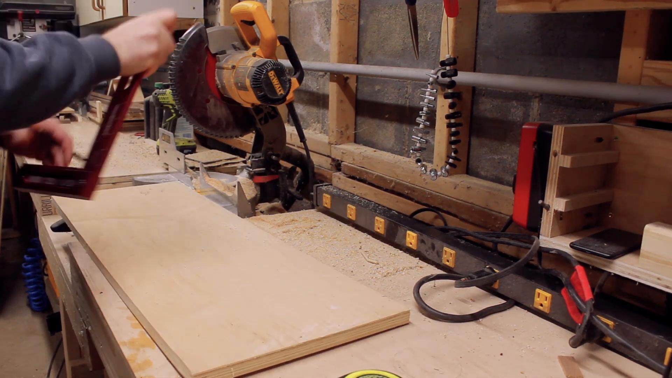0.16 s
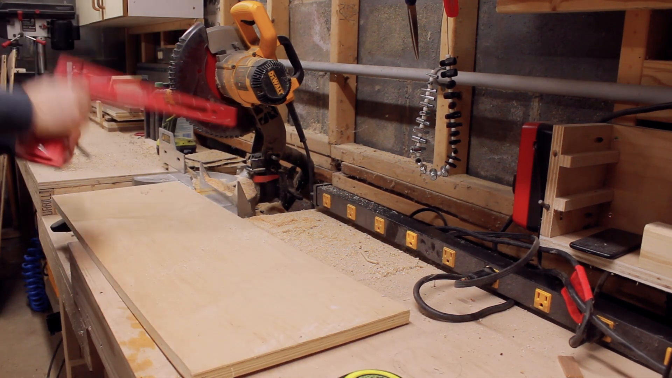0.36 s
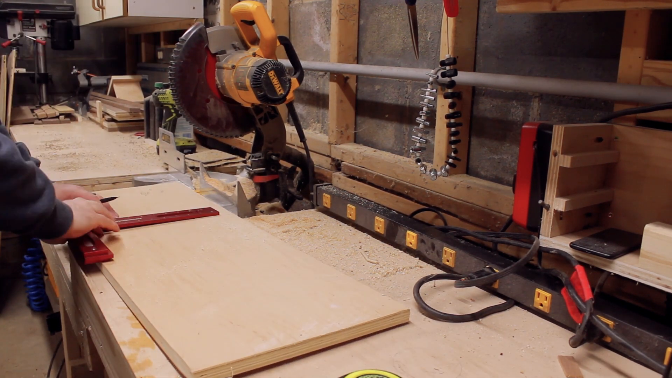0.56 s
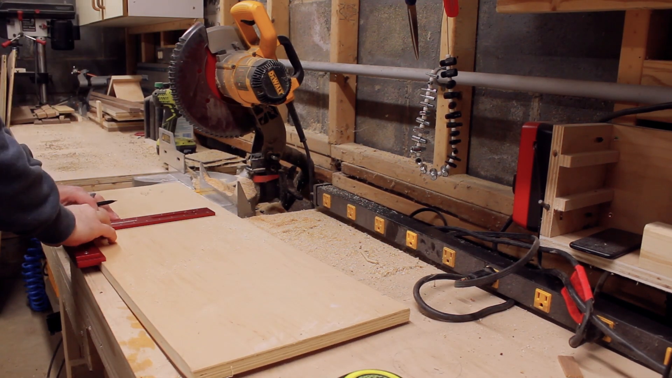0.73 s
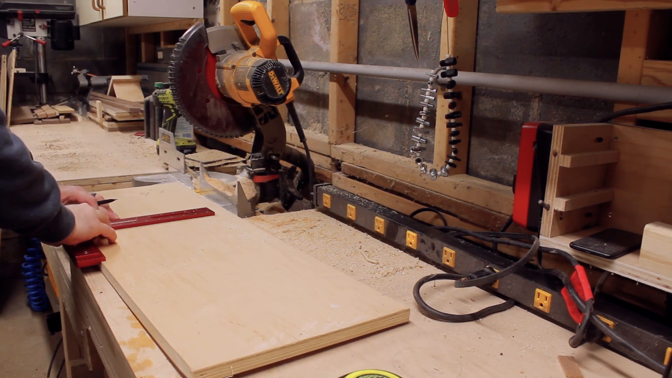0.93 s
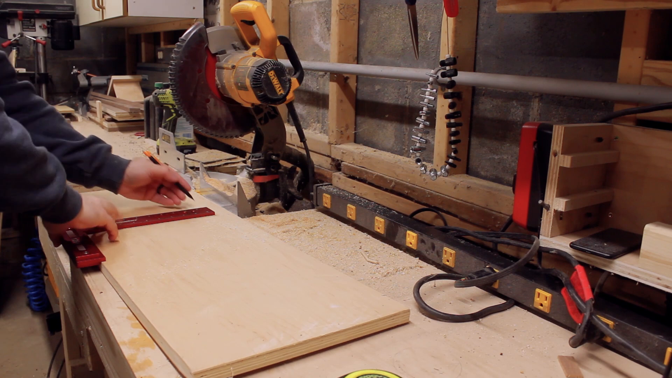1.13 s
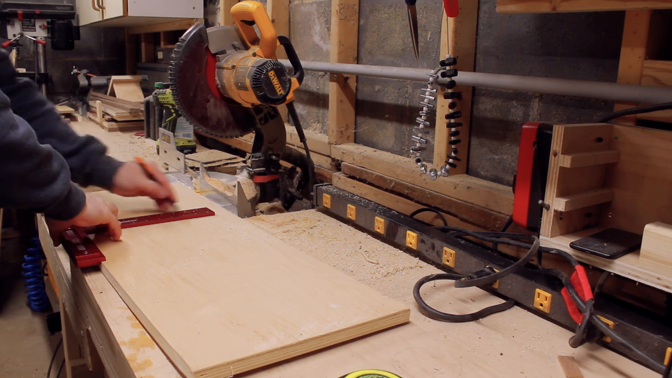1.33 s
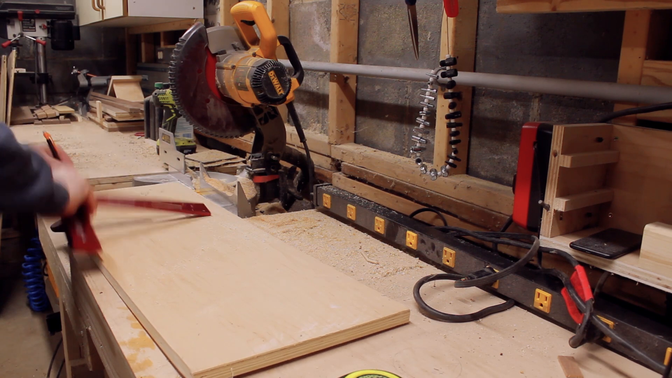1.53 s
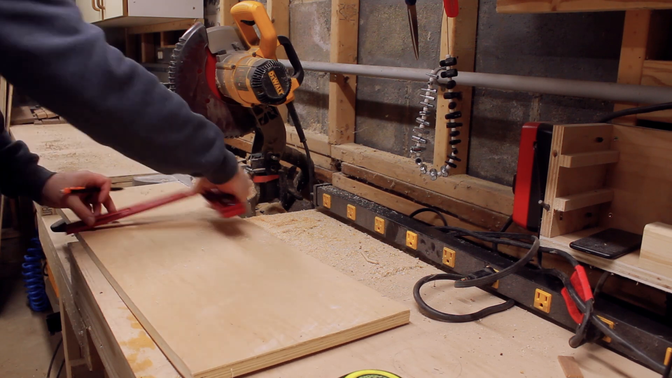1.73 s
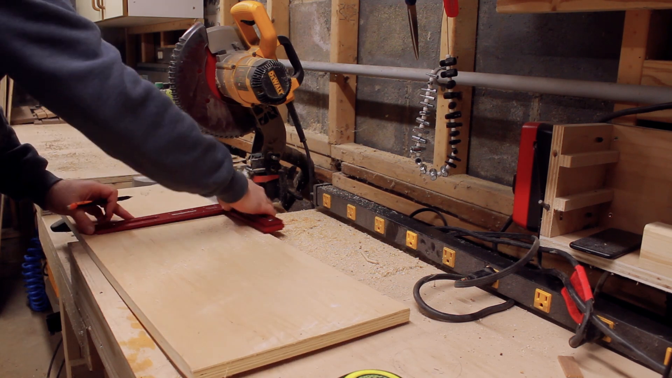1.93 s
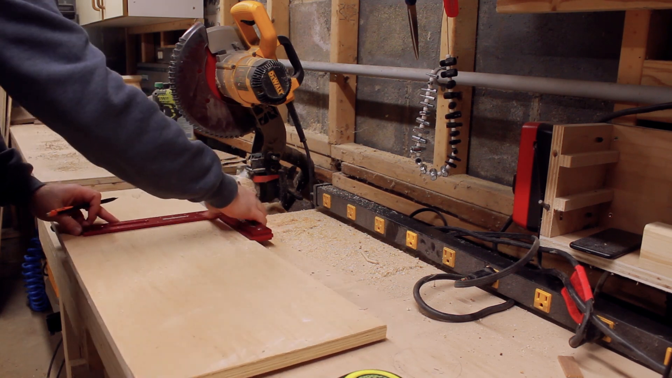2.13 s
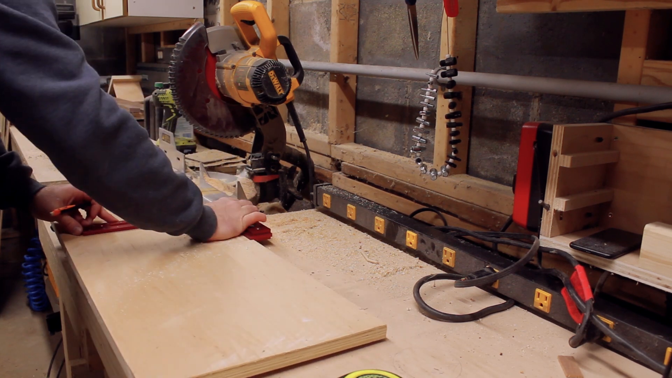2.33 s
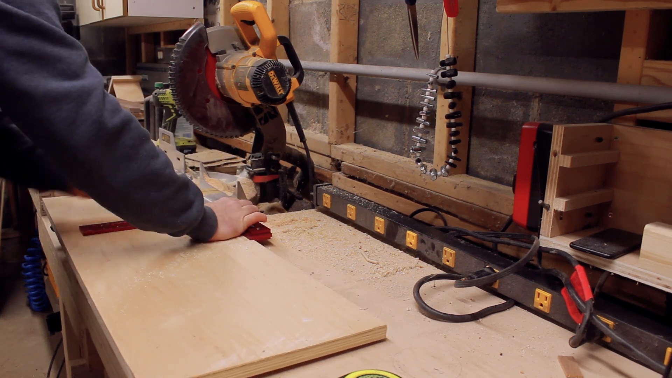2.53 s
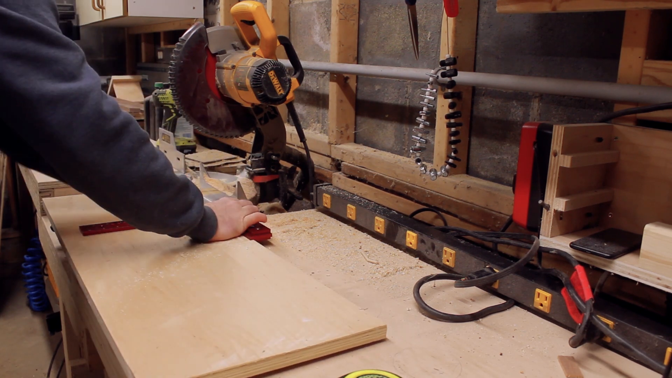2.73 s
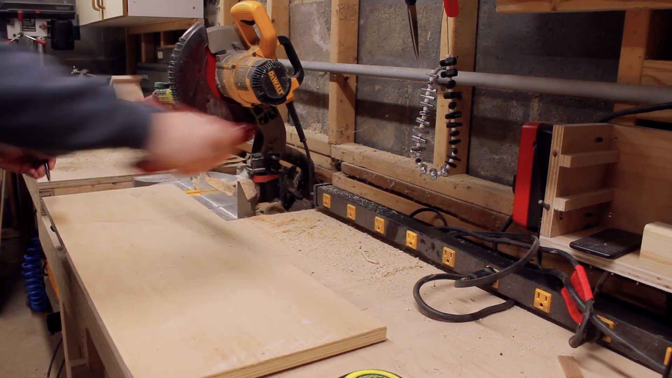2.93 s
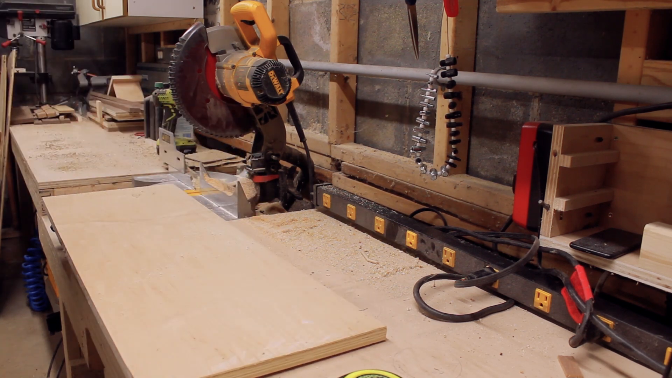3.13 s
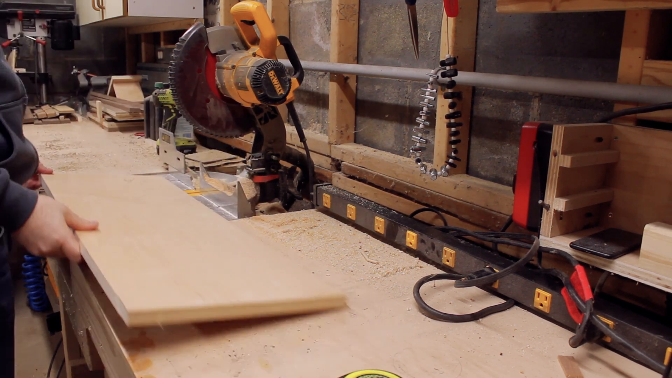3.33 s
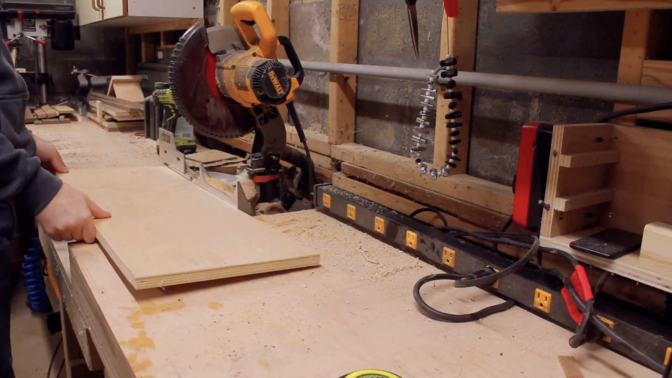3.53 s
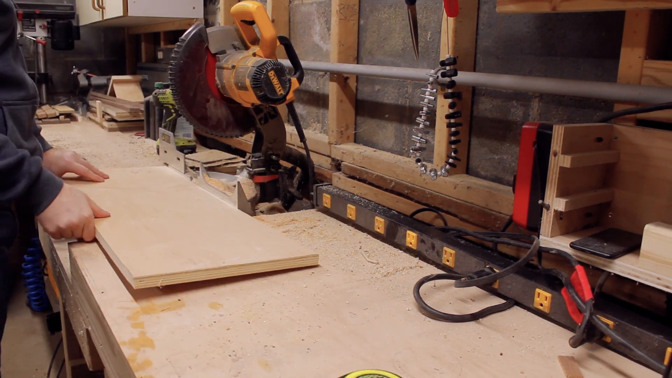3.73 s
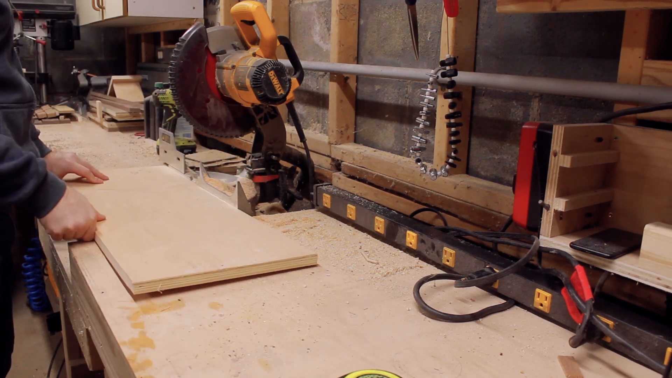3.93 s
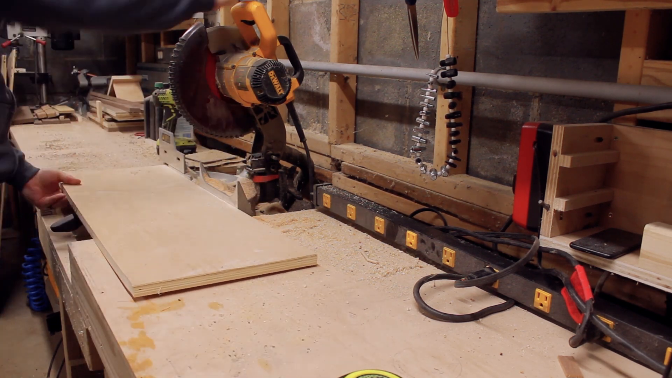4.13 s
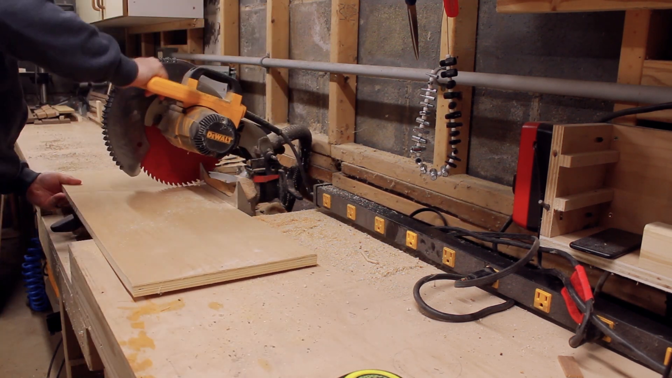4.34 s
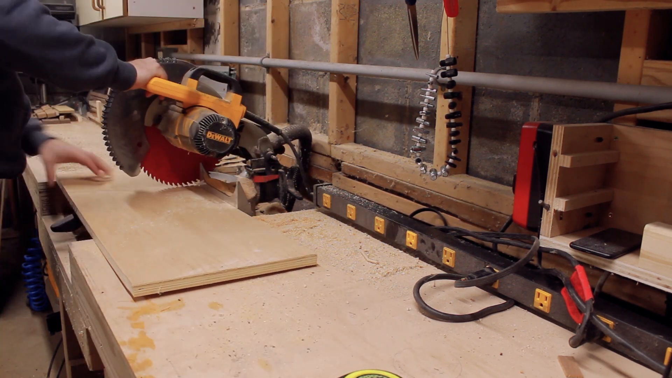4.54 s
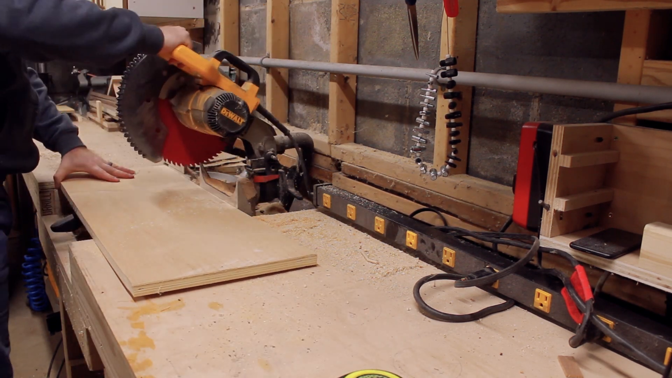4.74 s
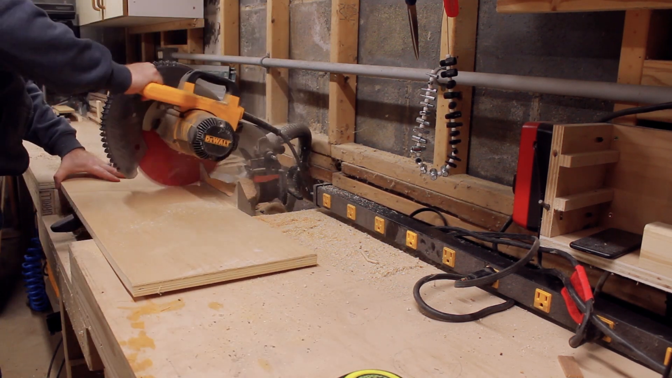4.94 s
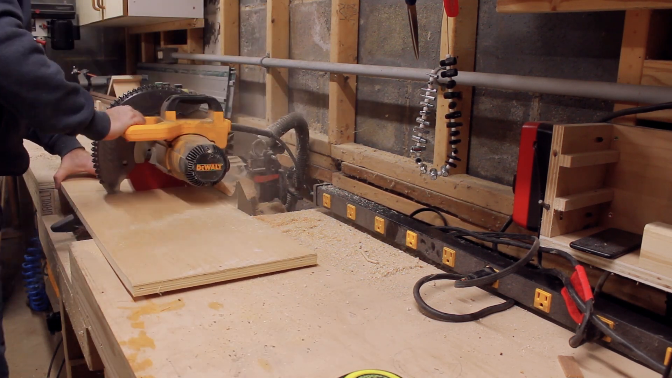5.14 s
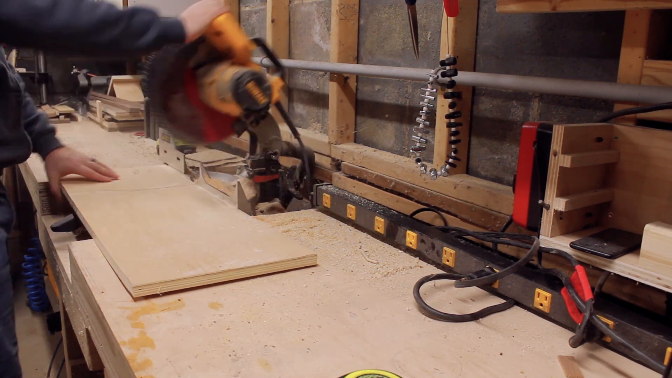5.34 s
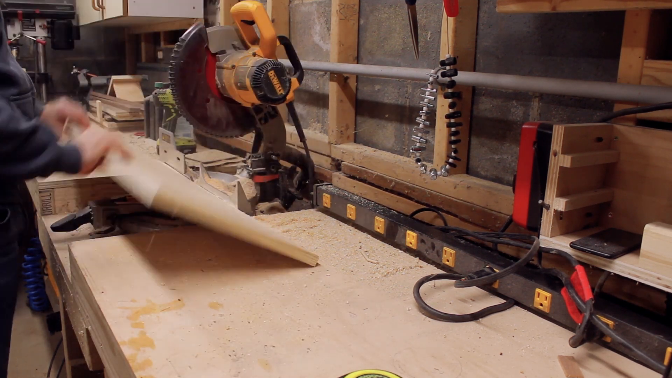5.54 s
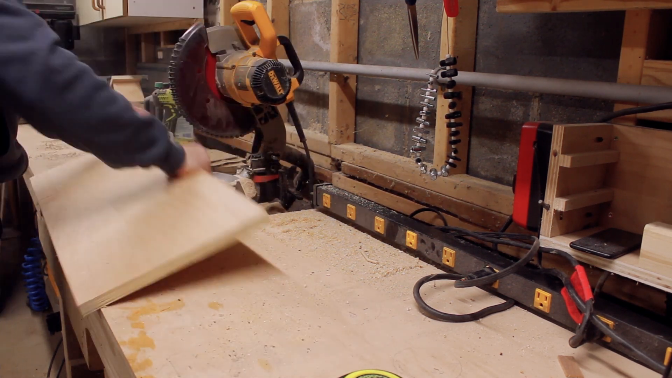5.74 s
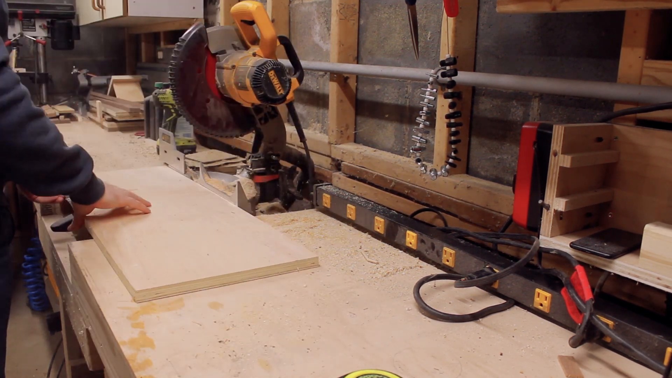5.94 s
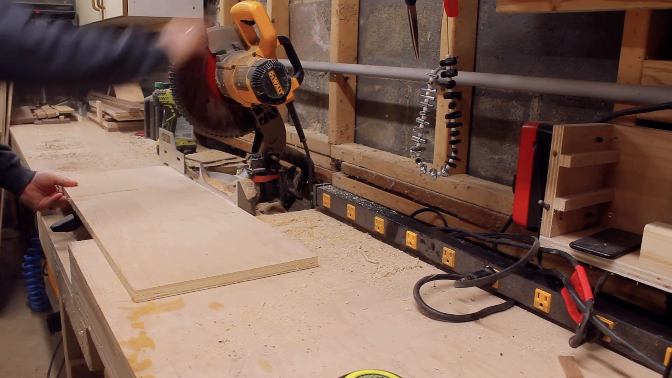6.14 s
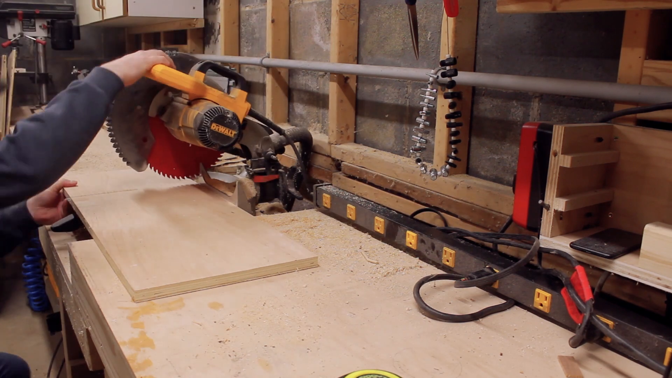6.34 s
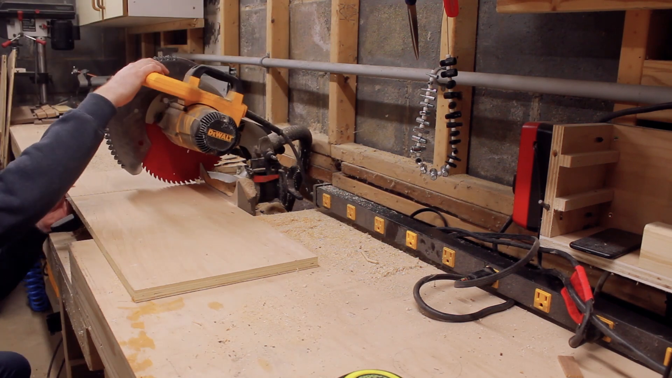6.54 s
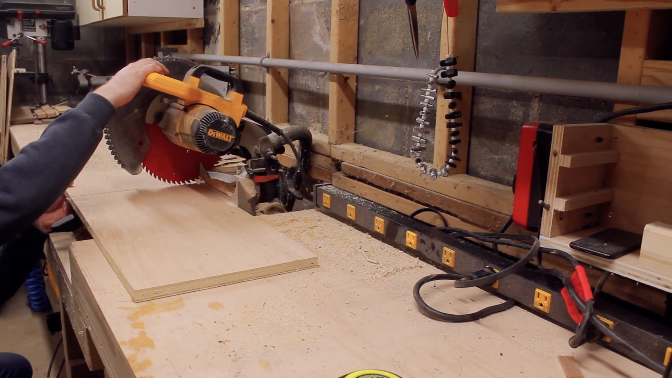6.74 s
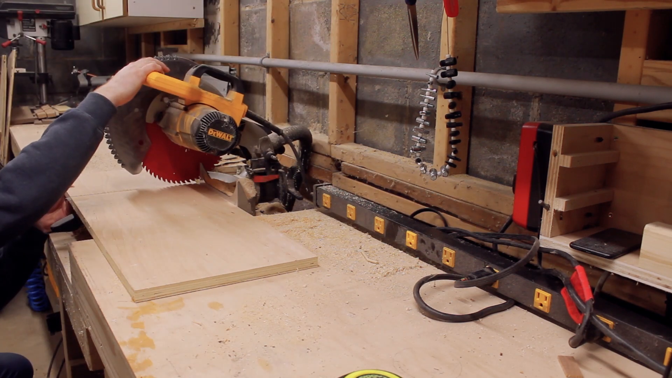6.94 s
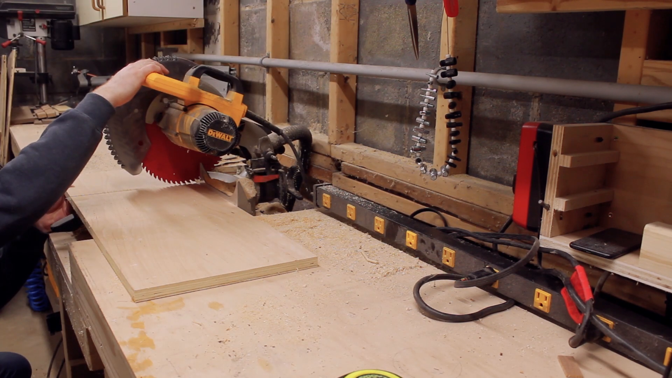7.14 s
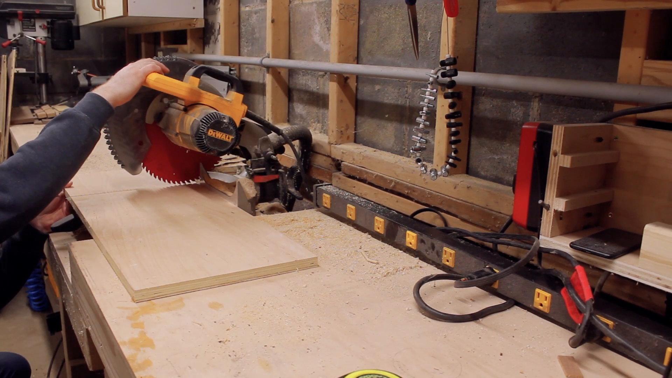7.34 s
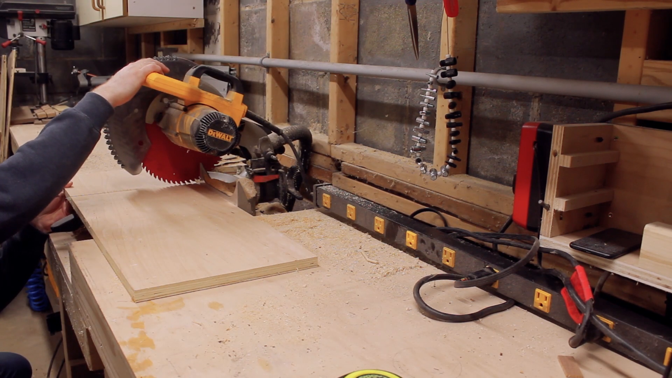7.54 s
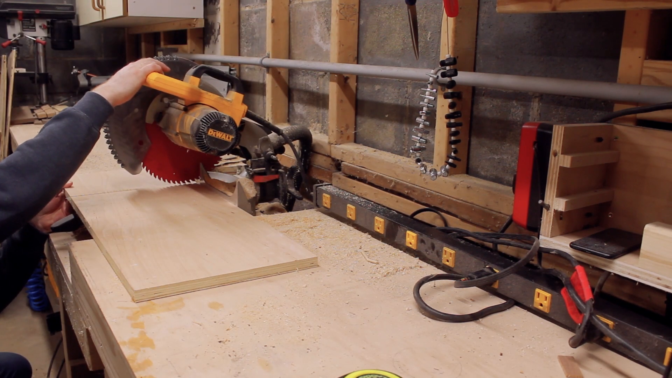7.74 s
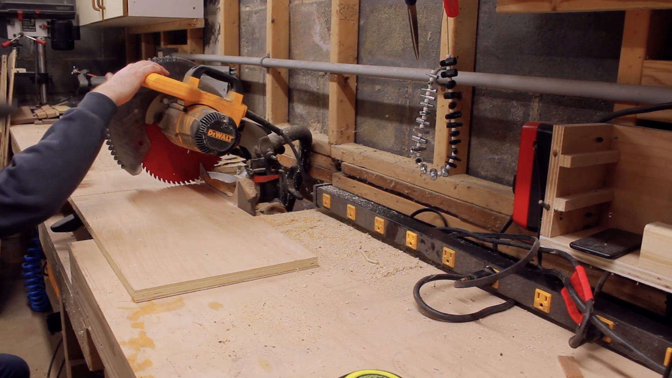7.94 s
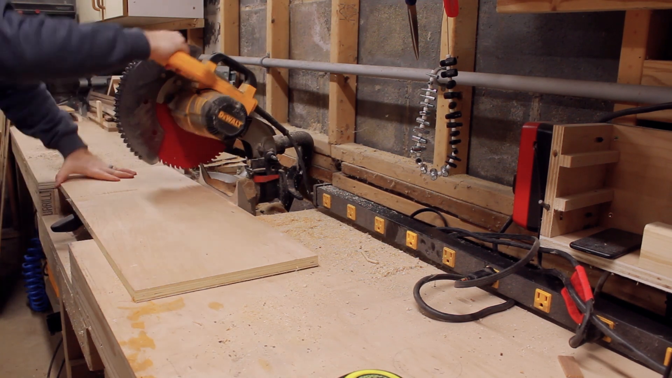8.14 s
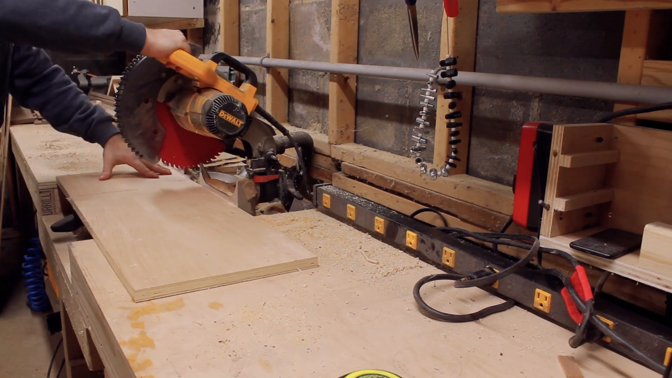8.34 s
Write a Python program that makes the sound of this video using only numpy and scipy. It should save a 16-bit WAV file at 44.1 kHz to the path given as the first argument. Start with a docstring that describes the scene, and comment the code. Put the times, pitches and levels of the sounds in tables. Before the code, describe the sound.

In a small, dry wood shop, sounds run several times faster than life. A square clacks crisply on plywood, a pencil ticks faintly, and the sheet scrapes and bumps into place. A miter saw jolts on, whines harshly through a very short cut and brakes. Two sharp plywood knocks follow, then near quiet with tiny taps over faint fan air and hum. Close, single-point pickup.

```python
"""A miter saw at work in a small wood shop, several times faster than life: pitches are high and rings short.
The saw jolts on, cuts with a whine that sags under load, and brakes: tones and noise follow the blade speed.
Before it a square clacks on plywood, a pencil marks it, the sheet is slid and knocked into place and the arm
swung down; after it the sheet is flipped and lined up again. Blows are noise bursts through resonances,
strokes are random snaps of fibre; duct-filtered fan noise and a steady two-tone electrical hum run throughout."""
import sys
import numpy as np
from scipy import signal
from scipy.fft import rfft, irfft, next_fast_len
from scipy.io import wavfile

SR = 44100
rng = np.random.default_rng(int(sys.argv[2]) if len(sys.argv) > 2 else 0)


def digitize_waveform(pressure):
    """Quantize a signal to 16-bit integers and store it at the path in sys.argv[1].

    Rows of a 2-D input are taken as channels; values are limited to [-1, 1].
    """
    field = np.atleast_2d(pressure).T
    bounded = np.clip(field, -1, 1)
    quanta = np.round(bounded * 32767).astype(np.int16)
    wavfile.write(sys.argv[1], SR, quanta)


N = 373949
TIME = np.arange(N) / SR
CUTOFF_HZ = 15900  # top of the audible band here
SWITCH_ON_S, BRAKE_ON_S = 4.8515, 5.278
# free speed of the blade, time constant of spin-up, share of speed lost at full load, time for braking to halve it
FREE_TURNS_PER_S, SPIN_UP_S, FULL_LOAD_SAG, BRAKE_HALVING_S = 268, 0.048, 0.245, 0.065
# motor current relative to what full load takes: switch-on surge, its decay, idling draw; then the overall level
INRUSH, INRUSH_S, IDLE_CURRENT, CURRENT_DB = 3.46, 0.029, 0.17, -38.5
WIND_FULL_TURNS_PER_S, WIND_POWER = 171, 2.54  # below this speed blade noise falls as a power of the speed
# How hard the blade is pushed through the sheet: time_s, load (0 to 1)
LOAD_CURVE = [(4.958, 0), (4.975, .44), (5.02, .6), (5.08, 1), (5.11, .97), (5.15, .77), (5.19, .36),
              (5.25, .07)]


def saw(throb, uneven_db):
    """Torque and speed balance: load slows the blade and raises the current, and both shape the sound."""
    load = np.interp(TIME, *np.transpose(LOAD_CURVE))
    since_on = np.maximum(TIME - SWITCH_ON_S, 0)
    since_brake = np.maximum(TIME - BRAKE_ON_S, 0)
    spin = FREE_TURNS_PER_S * (1 - np.exp(-since_on / SPIN_UP_S))
    spin = spin * (1 - FULL_LOAD_SAG * load) / (1 + since_brake / BRAKE_HALVING_S)
    flutter = 0.006 * drift(500)
    angle = 2 * np.pi * np.cumsum(spin * (1 + flutter)) / SR
    wind = np.minimum(spin / WIND_FULL_TURNS_PER_S, 1) ** WIND_POWER

    switch_times = [SWITCH_ON_S, SWITCH_ON_S + 0.005, BRAKE_ON_S - 0.02, BRAKE_ON_S + 0.02]
    powered = np.interp(TIME, switch_times, [0, 1, 1, 0])
    surge = INRUSH * np.exp(-since_on / INRUSH_S)
    current = powered * from_db(CURRENT_DB) * (surge + IDLE_CURRENT + load)

    # the blade bites harder once a turn, and unevenly
    bite = (1 + throb * np.sin(angle)) * from_db(uneven_db * drift(50))
    rush_level = wind * noise_level(load, surge, idle_db=-38, load_rise_db=8, surge_rise_db=14)
    spray_level = wind * noise_level(load, surge, idle_db=-37.5, load_rise_db=5.5, surge_rise_db=7)
    moving = bite * (cut_rush(rush_level) + chip_spray(spray_level))
    moving = moving + gear_whine(wind * current, spin, angle)
    moving = moving + brake_whine(rush_level, since_brake, spin, angle)
    moving = moving + tooth_whistle(wind, spin, angle)
    moving = moving + jolt(level_db=-17, rattle_s=0.018, fade_s=0.0092)
    return in_shop(moving, room_db=-3.0) + motor_buzz(current, powered)


def noise_level(load, surge, idle_db, load_rise_db, surge_rise_db):
    """Radiated noise grows with the work done: gain rises with cutting load and with the starting surge."""
    return from_db(idle_db + load_rise_db * load + surge_rise_db * np.minimum(surge, 1))


# Broad spectrum of motor and cut: pitch_hz, level_db (per Hz)
RUSH_COLOUR = [(80, -64), (220, -34), (350, -35), (600, -16.5), (1000, -8), (1800, 0), (2600, -3),
               (3300, 0), (4600, -2.5), (6000, -6.5), (9000, -34.5)]
# Resonances of housing and blade: pitch_hz, width_hz, level_db
SAW_RESONANCES = [(1100, 80, -3), (1720, 90, 4.5), (2140, 69, 5), (2395, 50, 3), (3140, 190, 5.5),
                  (3803, 110, 2.5), (4392, 70, 6.5)]


def cut_rush(level):
    """Resonant filtering of impulses: random snaps of fibre excite the housing and blade."""
    return level * rms_one(colour(grains(per_s=9800, spread_db=2.0), RUSH_COLOUR, SAW_RESONANCES))


# Broad spectrum of the flying chips: pitch_hz, level_db (per Hz)
CHIP_COLOUR = [(1000, -59), (3000, -38.5), (5000, 0), (9000, 5.5), (11000, 3.5), (13500, 2), (16000, -1.5)]


def chip_spray(level):
    """Shot noise: many tiny independent impacts merge into a bright hiss."""
    return level * rms_one(colour(grains(per_s=13000, spread_db=2.0), CHIP_COLOUR))


# Gear lines under load: multiple of the blade's turning, level_db
GEAR_LINES = [(1, -35), (23.5, -9), (30.3, 0), (35.5, -14), (42, -15)]


def gear_whine(level, spin, angle):
    """Order tones of meshing gears: pitch follows the speed and strength follows the torque."""
    return level * shaft_lines(GEAR_LINES, spin, angle)


# Whines under braking: multiple of the blade's turning, level_db (relative to the rush)
BRAKE_LINES = [(4, -10), (12, -3), (30, -5), (42, -6), (76, -5), (96, -4), (120, -3)]


def brake_whine(rush_level, since_brake, spin, angle):
    """Order tones of a decelerating shaft: they fall in pitch as the brake bites."""
    attack = np.minimum(since_brake / 0.025, 1)
    release = np.exp(-since_brake / 0.1)
    return rush_level * attack * release * shaft_lines(BRAKE_LINES, spin, angle)


def shaft_lines(orders, spin, angle):
    """Phase locking: rough tones at fixed multiples of the blade's turning, faded out above the cutoff."""
    total = 0
    for order, level_db in orders:
        audible = np.interp(order * spin, [CUTOFF_HZ, SR / 2], [1, 0])
        total = total + from_db(level_db + 2.7 * drift(40)) * np.sin(order * angle) * audible
    return np.sqrt(2) * total


TEETH, WHISTLE_DB = 60, -45  # level away from the resonances
# Blade resonances that the whistle sweeps over: pitch_hz, width_hz, level_db
WHISTLE_RESONANCES = [(10940, 1000, 17), (12200, 500, 7), (13260, 250, 15)]


def tooth_whistle(wind, spin, angle):
    """Air shed at the tooth-passing frequency: a narrow, unsteady whistle that flares at resonances."""
    in_phase = (1 + 0.5 * drift(100)) * np.sin(TEETH * angle)
    quadrature = 0.5 * drift(400) * np.cos(TEETH * angle)
    flare = resonance_gain(TEETH * spin, WHISTLE_RESONANCES)
    return from_db(WHISTLE_DB) * wind * flare * (in_phase + quadrature)


# Spectrum of gears taking up the slack: pitch_hz, level_db (per Hz)
SLACK_COLOUR = [(70, -66), (250, -39.5), (460, -19.5), (1000, -8.5), (1400, -19), (2000, -5), (4500, -2.5),
                (9000, -6), (16000, -20)]
# Resonances of the jolted gear case: pitch_hz, width_hz, level_db
GEAR_CASE_RESONANCES = [(475, 58.8, 8.5), (940, 140, 7.5), (1930, 110, 11), (2324, 128.8, 2),
                        (2800, 90, 2.5), (4170, 120, 5), (4680, 200, 2)]


def jolt(level_db, rattle_s, fade_s):
    """Impact excitation through slack: at switch-on the gears slam together and rattle for a moment."""
    age = TIME - SWITCH_ON_S
    strength = (age > 0) * np.exp(-np.maximum(age - rattle_s, 0) / fade_s)
    rattle = colour(grains(per_s=9000, spread_db=5.0) * strength, SLACK_COLOUR, GEAR_CASE_RESONANCES)
    return from_db(level_db) * rattle * np.linalg.norm(strength) / np.linalg.norm(rattle)


BUZZ_HZ = 479.7
# Magnetic buzz that grows with the current: multiple of the base pitch, level_db
BUZZ_LINES = [(1, -21), (2, -5), (4, 3.5), (5, -12), (7, -8)]
# Tones that ring the housing whatever the load: multiple of the base pitch, level_db
FIELD_LINES = [(2, -49.5), (3, -38.5)]


def motor_buzz(current, powered):
    """Magnetic forcing: harmonics of one wavering pitch, part following current and part the switch alone."""
    phase = 2 * np.pi * np.cumsum(BUZZ_HZ + 2.2 * drift(20)) / SR
    buzz = sum(from_db(db + 2 * drift(20)) * np.cos(k * phase) for k, db in BUZZ_LINES)
    field = sum(from_db(db + drift(15)) * np.sin(k * phase) for k, db in FIELD_LINES)
    return np.sqrt(2) * (current * buzz + powered * field)


# Square set down on the sheet: start_s, level_db, treble_db (high for a bare edge, low for a cushioned face)
SQUARE_CONTACTS = [(0.502, -40.5, 2.5), (0.555, -44.5, 4), (0.599, -36.5, 1.5), (0.607, -42.5, -5),
                   (0.686, -51, -17), (0.694, -35, -2), (1.761, -47.5, -19.5), (1.86, -33.5, 0.5),
                   (1.874, -45, -2), (1.951, -51, -9.5), (2.018, -58.5, -4), (2.145, -50, -4),
                   (2.151, -39.5, -4), (2.828, -62.5, -2), (2.937, -61, 5)]
# Broad colour of the square: pitch_hz, level_db (per Hz)
SQUARE_SPECTRUM = [(60, -42), (170, -26.5), (280, -28), (480, -9.5), (770, -6.5), (2100, 6), (2800, -4),
                   (6000, -5), (9000, -12), (16000, -27.5)]
# Resonances of the square: pitch_hz, width_hz, level_db (over the broad colour)
SQUARE_RESONANCES = [(494, 70, 2), (1476, 27, 5), (2200, 64, 3.5), (2370, 45, 6.5), (3294, 57, 11.5),
                     (4190, 110, 8.5), (5860, 51, -5), (8400, 190, 5.5)]


def square_blows():
    """Impact excitation of a square: edge or face on plywood sets off its resonances."""
    return blows(SQUARE_CONTACTS, SQUARE_SPECTRUM, SQUARE_RESONANCES, click_db=-2.0, crack_s=0.0035,
                 room_db=1.0, thump_db=-21, hard_rise_s=0.0032, soft_rise_s=0.0024)


# Sheet knocking on bench and fence, and at 2.068 s a soft thump of the square shifting on it: start_s,
# level_db, treble_db
SHEET_CONTACTS = [(2.068, -55.5, -15), (3.546, -48.5, -51), (3.619, -53, -33), (3.742, -55, -30),
                  (3.911, -65.5, -29), (3.984, -59, -21), (5.465, -45, -31), (5.766, -58, -20.5),
                  (5.774, -43, -9.5), (5.837, -25, 3.5), (5.868, -22, -1), (5.992, -31.5, -11.5),
                  (7.063, -44, -15.5), (7.804, -46.5, -16), (7.863, -63.5, -19), (8.233, -56.5, -4),
                  (8.273, -52, -11), (8.368, -46, -15.5)]
# Broad colour of the sheet: pitch_hz, level_db (per Hz)
SHEET_SPECTRUM = [(40, -54.5), (150, -26.5), (380, -15.5), (570, -6.5), (780, -6.5), (1200, -1.5),
                  (2200, -5), (3700, -6.5), (6500, -15), (10000, -21.5), (16000, -33)]
# Resonances of the sheet: pitch_hz, width_hz, level_db (over the broad colour)
SHEET_RESONANCES = [(619, 82, 7.8), (1020, 90, 3), (1420, 60, 1.9), (1690, 23, 4), (1760, 80, 5),
                    (2140, 70, 8.6), (2839, 110, 4.3), (5630, 160, 2.5)]


def sheet_blows():
    """Impact excitation of a plate: the plywood knocks on bench and fence, and once thumps softly as the square
    shifts on it."""
    return blows(SHEET_CONTACTS, SHEET_SPECTRUM, SHEET_RESONANCES, click_db=-6.5, crack_s=0.0028,
                 room_db=2.0, thump_db=-19.0, hard_rise_s=0.0022, soft_rise_s=0.004)


# Saw arm and blade guard clacking: start_s, level_db, treble_db
GUARD_CONTACTS = [(4.239, -56.5, 0.5), (4.261, -59.5, -6), (5.278, -39, -4), (5.453, -47, 1),
                  (6.279, -56, 1), (6.302, -57.5, 1), (6.442, -79, 11)]
# Broad colour of the guard: pitch_hz, level_db (per Hz)
GUARD_SPECTRUM = [(60, -53), (200, -31), (535, -7), (1500, -4), (3000, 2), (4200, -3), (9400, -7.5),
                  (16000, -17)]
# Resonances of the guard: pitch_hz, width_hz, level_db (over the broad colour)
GUARD_RESONANCES = [(2170, 87, 5.1), (3050, 190, 8.2), (5800, 200, 2.8), (8420, 420, 2.8)]


def guard_blows():
    """Impact excitation of arm and guard: each clack sets off their resonances."""
    return blows(GUARD_CONTACTS, GUARD_SPECTRUM, GUARD_RESONANCES, click_db=-8, crack_s=0.0052,
                 room_db=5.5, thump_db=-22.5, hard_rise_s=0.0015, soft_rise_s=0.0029)


THUMP_GROWTH = 0.73  # dB of low thump per dB of strength: gentle blows sound rounder, hard ones sharper


def blows(hits, spectrum, modes, click_db, crack_s, room_db, thump_db, hard_rise_s, soft_rise_s):
    """Source-filter impact: a click, a brief crack and the room's reflections drive the object's resonances."""
    out = np.zeros(N)
    early = SR // 50  # the 20 ms whose levels are set
    for start_s, strength_db, treble_db in hits:
        tail = shop_tail()
        t = TIME[:len(tail)]
        hardness = np.interp(treble_db, [-14, 2], [0, 1])  # cushioned to bare edge
        rise_s = soft_rise_s + hardness * (hard_rise_s - soft_rise_s)
        rise = 1 - np.exp(-(t / rise_s) ** 2)
        crack = rng.standard_normal(len(t)) * rise * np.exp(-t / crack_s)
        force = crack / np.linalg.norm(crack) + from_db(room_db) * tail * rise
        force[SR // 500] += hardness * from_db(click_db)  # click 2 ms in
        # each knock favours the resonances a little differently, at random
        struck = [(hz, width, db + 3 * rng.standard_normal()) for hz, width, db in modes]
        knock = colour(force, spectrum, struck)
        # strength and hardness tilt the whole colour
        low_db = thump_db + THUMP_GROWTH * strength_db
        wanted_db = np.array([low_db, strength_db, strength_db + treble_db])
        low, middle, high = wanted_db - band_levels(knock[:early])
        add(out, start_s, colour(knock, [(700, low), (1400, middle), (2600, middle), (5500, high)]))
    return out


def band_levels(x):
    """Three-band analysis: low, middle and high level in dB, split at 1 and 4 kHz."""
    levels = []
    for hz, kind in [(1000, "low"), ([1000, 4000], "band"), (4000, "high")]:
        band = signal.sosfilt(signal.butter(4, hz, kind, fs=SR, output="sos"), x)
        levels.append(20 * np.log10(np.std(band)))
    return np.array(levels)


# Blows that leave the square or the sheet free to ring: start_s, pitch_hz, level_db, t60_s
FREE_RING_EVENTS = [(.503, 5650, -30.5, 0.093), (2.068, 619, -51, 0.17), (2.82, 2210, -50, 0.16),
                    (3.911, 615, -51, 0.18), (5.84, 629.6, -25.5, .2), (5.995, 1845, -27.5, 0.15),
                    (8.369, 2175, -35.5, 0.12)]


def free_rings(width_hz):
    """Free vibration: let go by the hand, a struck thing rings briefly in a cluster of close modes."""
    out = np.zeros(N)
    for start_s, hz, level_db, t60_s in FREE_RING_EVENTS:
        age = np.maximum(TIME - start_s, 0)
        swell = 1 - np.exp(-age / 0.0026)
        decay = from_db(level_db - 60 * age / t60_s)
        beating = np.tanh(2 * drift(width_hz))
        out += decay * swell * beating * np.sin(2 * np.pi * hz * age)
    return out


RUMBLE_DB, RUMBLE_DB_PER_OCTAVE = -9, -2.5  # re the hiss at a 1 kHz scuff; finer points shake the board less
# Strokes of pencil, square, sheet and swinging guard: strongest_s, length_s, level_db, scuff_hz
RUB_STROKES = [(1.395, 0.032, -60, 4300), (1.465, 0.057, -60.5, 6100), (1.628, 0.015, -57, 6100),
               (1.81, 0.08, -63.5, 1600), (2.08, 0.045, -56.5, 1950), (2.815, 0.046, -59, 2260),
               (2.922, 0.036, -62, 1620), (3.402, 0.043, -54, 2270), (3.46, 0.05, -55.5, 1260),
               (3.54, 0.036, -58.5, 1100), (3.68, 0.03, -65, 2000), (4.275, 0.06, -61, 2880),
               (6.315, 0.039, -56.5, 2970)]
# Hiss of the rubbing: pitch_hz, level_db (per Hz)
HISS_COLOUR = [(100, -46), (600, -16), (1500, 5), (5000, 1.5), (8000, -0.5), (16000, -14.5)]
# Rumble of the board underneath: pitch_hz, level_db (per Hz)
RUMBLE_COLOUR = [(50, -37), (130, -16), (175, 6), (230, -10), (620, 14), (1000, 10), (2000, -24)]


def rubbing(scuff_db, scuff_width):
    """Friction on a rough surface: catches on the grain give a gritty hiss, a scuff pitch and board rumble."""
    out = np.zeros(N)
    span = SR // 2
    middle_s = span / SR / 2
    catches = grains(per_s=3000, spread_db=1.0) * from_db(2.2 * drift(65))
    for k, (strongest_s, length_s, level_db, scuff_hz) in enumerate(RUB_STROKES):
        slips = catches[k * span:(k + 1) * span]
        scuff = [(scuff_hz, scuff_width * scuff_hz, scuff_db)]
        hiss = rms_one(colour(slips, HISS_COLOUR, scuff))
        rumble_db = RUMBLE_DB + RUMBLE_DB_PER_OCTAVE * np.log2(scuff_hz / 1000)
        rumble = from_db(rumble_db) * rms_one(colour(slips, RUMBLE_COLOUR))
        pressure = np.exp(-2 * ((TIME[:span] - middle_s) / length_s) ** 2)
        add(out, strongest_s - middle_s, from_db(level_db) * pressure * (hiss + rumble))
    return in_shop(out, room_db=-1.5)


DRAG_FROM_S, DRAG_TO_S, DRAG_HZ, DRAG_DB = 3.35, 3.99, 175, -82


def drag(wander_hz):
    """Frictional judder: a faint, low, wandering tone of the sheet sliding on the bench."""
    arch = np.sqrt(np.clip((TIME - DRAG_FROM_S) * (DRAG_TO_S - TIME), 0, None))
    moving = arch * 2 / (DRAG_TO_S - DRAG_FROM_S)  # peaks at 1
    phase = 2 * np.pi * np.cumsum(DRAG_HZ + wander_hz * drift(20)) / SR
    return moving * from_db(DRAG_DB + 2 * drift(15)) * np.sin(phase)


# Air noise of the fan: pitch_hz, level_db (per Hz)
FAN_AIR_COLOUR = [(25, -34.5), (60, -28), (100, -12), (180, -9.5), (320, -15.5), (480, -7), (750, -4),
                  (1400, 1.5), (2400, -1.5), (3600, -3.5), (5000, -8), (9000, -12.5), (13000, -16),
                  (16000, -21)]
# Resonances of the duct: pitch_hz, width_hz, level_db
DUCT_RESONANCES = [(466, 20, 14), (927, 31, 16.3), (1380, 89, 4.3), (1890, 49.4, 6.9), (2272, 140, 6.1),
                   (2470, 12, 4), (3077, 45, 9.3), (4030, 57, 7), (4120, 25, 7)]


def fan(air_db):
    """Turbulence in a resonant duct: broadband air noise filtered by the duct's resonances."""
    return from_db(air_db) * rms_one(colour(rng.standard_normal(N), FAN_AIR_COLOUR, DUCT_RESONANCES))


# Steady electrical hum: pitch_hz, level_db (rms), wander_hz
HUM_TONES = [(475.5, -72, 0.81), (966, -78.5, 1.8)]


def hum():
    """Narrow-band tones: a steady electrical hum of two slightly wandering pitches."""
    out = np.zeros(N)
    for hz, level_db, wander_hz in HUM_TONES:
        phase = 2 * np.pi * np.cumsum(hz + wander_hz * drift(12)) / SR
        out += from_db(level_db + drift(9.4)) * np.sqrt(2) * np.sin(phase)
    return out


def in_shop(x, room_db):
    """Superposition of direct and reverberant sound, at roughly unchanged power."""
    wet = from_db(room_db)
    reflections = signal.fftconvolve(x, shop_tail())[:N]
    return (x + wet * reflections) / np.sqrt(1 + wet ** 2)


# Reverberation time of the shop: pitch_hz, t60_s
SHOP_REVERB = [(200, 0.22), (530, 0.19), (1400, .17), (3700, 0.12), (9700, 0.12), (15000, 0.13)]


def shop_tail():
    """Exponential decay of a diffuse field: dense reflections, each band with its own t60; energy 1."""
    t = TIME[:SR // 4]
    edges = np.geomspace(40, 19000, 10)
    white = rfft(rng.standard_normal(len(t)))
    hz = np.fft.rfftfreq(len(t), 1 / SR)
    tail = np.zeros(len(t))
    for low, high in zip(edges, edges[1:]):
        t60_s = at_hz(SHOP_REVERB, np.sqrt(low * high))
        band = irfft(white * ((hz >= low) & (hz < high)), len(t))
        tail += band * np.exp(-np.log(1000) * t / t60_s)
    return tail / np.linalg.norm(tail)


def grains(per_s, spread_db):
    """Poisson-like process: tiny snaps of uneven size and random sign at random instants."""
    sizes = from_db(spread_db * np.minimum(rng.exponential(1, N), 4))
    signs = rng.choice([-1, 1], N)
    return sizes * signs * (rng.random(N) < per_s / SR)


def colour(x, spectrum, modes=()):
    """Minimum-phase filtering: a broad spectrum with resonances standing out of it, made causal."""
    size = next_fast_len(len(x) + 2048, real=True)
    size += size % 2
    hz = np.maximum(np.fft.rfftfreq(size, 1 / SR), 1)
    gain = from_db(at_hz(spectrum, hz)) * resonance_gain(hz, modes)
    cepstrum = irfft(np.log(gain))
    # folding the cepstrum onto positive time gives the minimum phase
    fold = np.r_[1, np.full(size // 2 - 1, 2), 1, np.zeros(size // 2 - 1)]
    response = np.exp(rfft(cepstrum * fold))
    return irfft(rfft(x, size) * response)[:len(x)]


def resonance_gain(hz, modes):
    """Lorentzian resonance: gain by which modes stand out of a flat response."""
    power = 1
    for centre, width, db in modes:
        peak = np.maximum(from_db(db) ** 2 - 1, 0)
        power = power + peak / (1 + (2 * (hz - centre) / width) ** 2)
    return np.sqrt(power)


def drift(rate_hz):
    """Slow randomness: straight lines between random knots, scaled to an rms of 1."""
    knots = rng.standard_normal(int(N / SR * 2 * rate_hz) + 2)
    return rms_one(np.interp(TIME * 2 * rate_hz, np.arange(len(knots)), knots))


def at_hz(points, hz):
    """Logarithmic pitch: read a spectrum by interpolating on a log-frequency axis."""
    point_hz, values = np.transpose(points)
    return np.interp(np.log(hz), np.log(point_hz), values)


def from_db(db):
    """Decibel law: 20 dB is a tenfold amplitude."""
    return 10 ** (np.asarray(db) / 20)


def rms_one(x):
    """Effective value: scale to an rms of 1."""
    return x / np.sqrt(np.mean(x ** 2) + 1e-20)


def add(out, start_s, sound):
    """Superposition: mix a sound in at a time."""
    start = round(start_s * SR)
    out[start:start + len(sound)] += sound[:N - start]


def scene():
    """Superposition of all the work at the bench, heard from one place."""
    machine = saw(throb=0.2, uneven_db=1.0)
    struck = square_blows() + sheet_blows() + guard_blows() + free_rings(width_hz=97)
    slid = rubbing(scuff_db=8.0, scuff_width=0.054) + drag(wander_hz=4)
    background = fan(air_db=-66) + hum()
    return (machine + struck + slid + background)[None]


def record(dry):
    """Clipping and band limiting: the very sharpest peaks are clipped, and the top is cut steeply."""
    top = 0.85
    lowpass = signal.ellip(12, 0.1, 80, CUTOFF_HZ, fs=SR, output="sos")
    return signal.sosfilt(lowpass, np.clip(dry, -top, top))


dry = scene()
out = record(dry)
digitize_waveform(out)
```